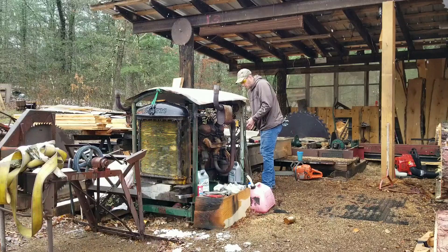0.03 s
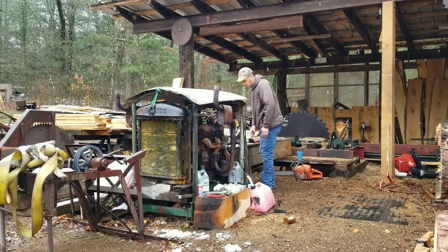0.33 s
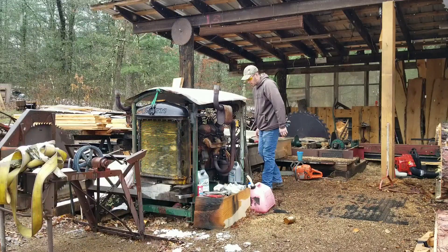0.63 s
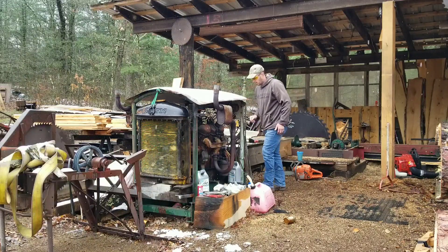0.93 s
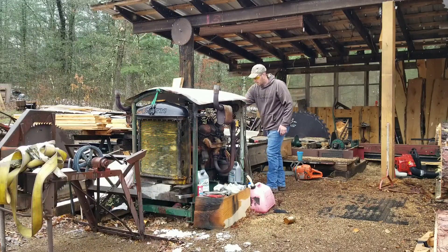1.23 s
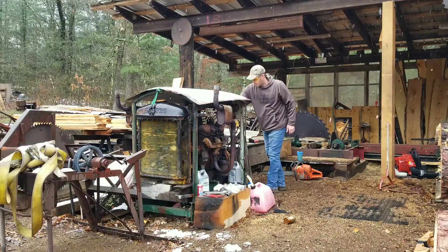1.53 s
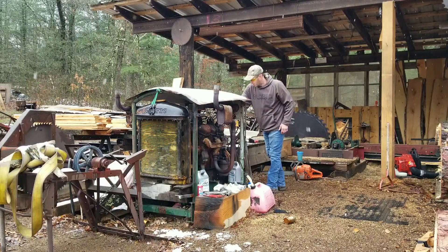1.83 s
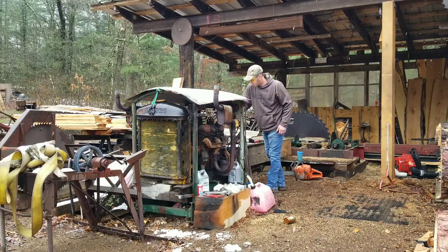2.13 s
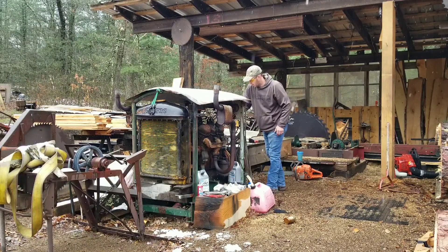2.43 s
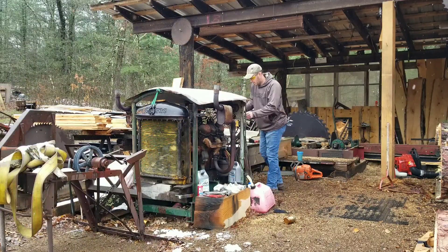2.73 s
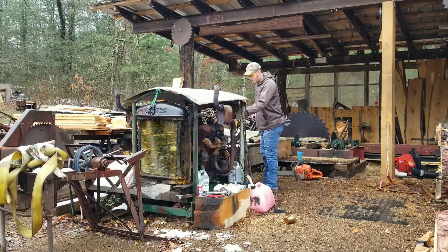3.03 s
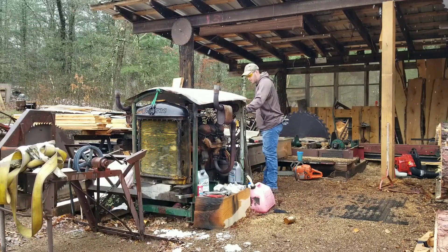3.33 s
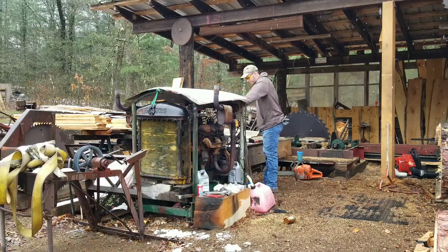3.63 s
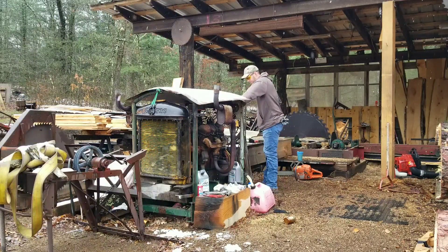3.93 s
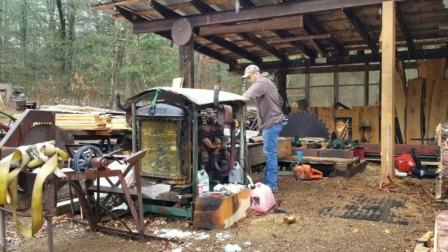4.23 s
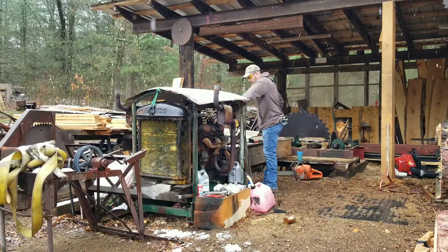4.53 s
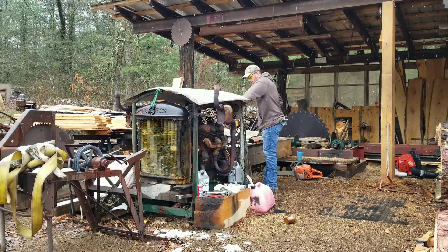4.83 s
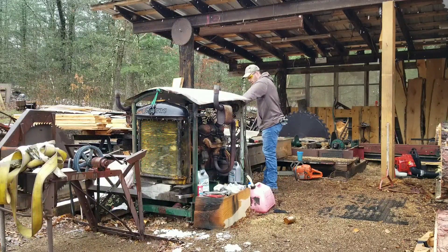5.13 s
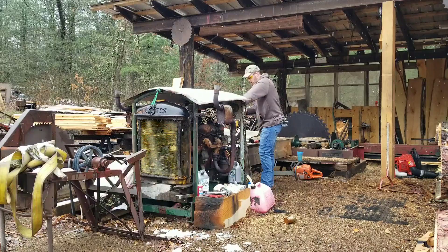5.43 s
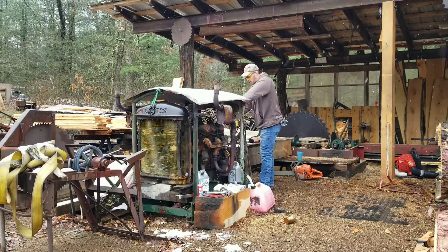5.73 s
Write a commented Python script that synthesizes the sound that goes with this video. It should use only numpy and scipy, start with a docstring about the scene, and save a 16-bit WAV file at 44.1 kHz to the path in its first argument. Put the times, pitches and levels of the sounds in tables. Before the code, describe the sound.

From the start, an old engine idles with low, uneven chugs about four times a second, with hard knocks, clacking valves and a jingle of loose metal. It slows slightly and stops firing near 1.8 seconds. Around 2 seconds it rocks to rest with a clunk, then a softer one at 2.4, along with a hollow rubbing and a hiss of escaping air that fade by about 3 seconds. A quiet gap holds only faint outdoor hiss and tiny ticks. Small clicks come near 3.9 seconds, and at 4.1 the starter engages with a loud metallic slam. It whirs up and cranks the engine with a growling, scraping gear whine that sags and surges about six times a second, continuing to the end near 6 seconds without the engine catching. Everything is heard from a few metres away, beside an open shed with very little echo.

```python
"""Sawmill engine, stopped and cranked

An old six-cylinder engine idles under an open shed: firings boom in the pipe and knock the block,
valves clack, loose gear rattles. Switched off, it slows and rocks to rest with a clunk, leaking air.
After a quiet gap the solenoid clicks, the starter pinion slams in and cranks the engine: the gear
growl sags on every compression stroke and slackens after it. Heard from a few metres off in the yard."""
import sys
import numpy as np
from scipy import signal
from scipy.fft import rfft, irfft
from scipy.io import wavfile
from scipy.ndimage import uniform_filter1d

SR = 44100
rng = np.random.default_rng(int(sys.argv[2]) if len(sys.argv) > 2 else 0)


def dump_mix(stems):
    """Bounce the given channels to the path in sys.argv[1] as a 16-bit WAV at rate SR."""
    frames = np.atleast_2d(stems).T  # one column per channel
    limited = np.clip(frames, -1, 1)  # hard clip at full scale
    pcm = np.round(limited * 32767).astype(np.int16)
    wavfile.write(sys.argv[1], SR, pcm)


N = 264600
T = np.arange(N) / SR


def undb(db):
    """Decibels to gain."""
    return 10 ** (np.asarray(db) / 20)


def unit(x):
    """Scale to rms 1."""
    return x / np.sqrt(np.mean(x ** 2))


def noise():
    """White noise."""
    return rng.standard_normal(N)


def ramp(start, end):
    """A fade from 0 at start to 1 at end; a fade-out if end comes first."""
    return np.clip((T - start) / (end - start), 0, 1)


def swell(at, rise, fall):
    """A straight rise to 1 and a straight fall back to 0."""
    return ramp(at - rise, at) * ramp(at + fall, at)


def release(start, t60):
    """An envelope that holds at 1 until start, then dies away."""
    return np.exp(-np.log(1000) * np.maximum(T - start, 0) / t60)


def decay(start, t60):
    """An envelope that jumps up at start and dies away."""
    return (T >= start) * release(start, t60)


def sift(x, hz, kind, order=2):
    """A plain low-pass or high-pass."""
    return signal.sosfilt(signal.butter(order, hz, kind, fs=SR, output="sos"), x)


def flutter(rate_hz, depth_db):
    """A gain that wanders at random."""
    return undb(depth_db * np.clip(unit(sift(noise(), rate_hz, "low")), -2, 2))


def convolve(x, response):
    """Pass a sound through an impulse response."""
    return signal.fftconvolve(x, response.reshape((1,) * (x.ndim - 1) + (-1,)), axes=-1)[..., :N]


def colour(x, points, size=4096):
    """Causal EQ through (Hz, dB) points that keeps the power of white noise."""
    hz, db = np.transpose(points)
    bin_hz = np.arange(size // 2 + 1) * SR / size
    log_gain = np.log(undb(np.interp(np.log(bin_hz + 1), np.log(hz), db)))
    cepstrum = irfft(log_gain)[:size // 2]
    cepstrum[0] /= 2
    response = irfft(np.exp(rfft(2 * cepstrum, size)))
    return convolve(x, response / np.linalg.norm(response))


def resonate(x, hz, width):
    """One resonance, gain 1 at its centre."""
    return signal.lfilter(*signal.iirpeak(hz, hz / width, fs=SR), x)


def ring(hits, hz, t60, phase=0):
    """One mode, struck by each impulse."""
    pole = np.exp((2j * np.pi * hz - np.log(1000) / t60) / SR)
    return (signal.lfilter([1], [1, -pole], hits + 1e-18) * np.exp(1j * phase)).imag


def taps(times, gains):
    """Impulses at the given times."""
    return np.bincount((np.clip(times, 0, None) * SR).astype(int), gains * (times >= 0), N)[:N]


def diffuse(split_hz=1300):
    """Stereo noise: alike in the bass, wide in the treble."""
    common = noise()
    wide = 0.11 * common + 0.88 * rng.standard_normal((2, N))
    return unit(sift(common, split_hz, "low", order=1) + sift(wide, split_hz, "high", order=1))


def stereo_phase(radians=0.54):
    """A high mode reaches one microphone or the other first."""
    return radians * rng.permutation([1, -1])[:, None]


def bursts(hits, t60):
    """Each impulse shakes many close modes: a burst of noise that swells quickly and dies."""
    return convolve(hits, decay(0, t60) * (1 - decay(0, 0.04))) * diffuse()


def grains(per_s, spread_db, t60, bed):
    """Many small collisions of uneven size over a bed of countless finer ones."""
    sizes = (rng.random(N) < per_s / SR) * undb(spread_db * np.clip(noise(), -2, 2))
    return unit(unit(bursts(sizes, t60)) + bed * diffuse())


def loose_part(hz, t60, per_s, spread=0.0306, count=4):
    """A loose part taps at random; where it is touched picks one of a few close pitches."""
    sound = 0
    for pitch in hz * (1 + spread * np.linspace(-1, 1, count)):
        hits = (rng.random(N) < per_s / count / SR) * rng.uniform(-0.88, 1, N)
        sound += ring(hits, pitch, t60, stereo_phase())
    return unit(sound)


def shimmer(hz):
    """A cluster of close modes around one pitch, rms 1."""
    width = 60 + hz / 35
    return unit(resonate(resonate(noise(), hz, width), hz, width))


# the idle's pulse, one row per four-stroke cycle: (start [s], exhaust [dB], knock [dB])
CYCLES = [(-.178, -6, 4), (.050, -6, 3), (.275, -5, 2.5), (.507, -4.5, 1.5), (.741, -3.5, -4),
          (0.991, -7.5, -3.5), (1.245, -6, -2.5), (1.504, -9, -1.5), (1.786, -28, 1.5)]
# accents in firing order: (place in the cycle [0-1], exhaust [dB], knock [dB], valve clack [dB])
CYLINDERS = [(0, 9, 1.5, -22), (0.159, 4, 0, -43), (0.336, 4.5, 2.5, -31.5), (0.492, -8.5, -1, -49),
             (0.668, 7, -0.5, -24), (0.825, -18, -0.5, -36)]


def firings():
    """Six cylinders fire in turn: times, boom gains, knock gains and valve levels in dB."""
    start, cycle_boom_db, cycle_knock_db = np.transpose(CYCLES)
    place, boom_db, knock_db, valve_db = np.transpose(CYLINDERS)
    cycle = np.arange(len(start))
    count = (len(start) - 1) * len(place) + 1  # the last cycle fires only once
    times = np.interp((cycle[:, None] + place).ravel()[:count], cycle, start)
    booms = undb((cycle_boom_db[:, None] + boom_db).ravel()[:count])
    knocks = undb((cycle_knock_db[:, None] + knock_db).ravel()[:count] + rng.standard_normal(count))
    return times, booms, knocks, np.resize(valve_db, count)


# stray puffs from late burns and unfired cylinders: (time [s], level [dB])
PUFFS = [(0, -0.5), (1.6, -9), (1.643, -3), (1.755, -0.5), (1.805, -1.5), (1.911, -14), (1.981, -21),
         (2.042, -4.5)]


def exhaust(times, booms):
    """Each puff of gas booms in two low modes of the pipe."""
    puff_s, puff_db = np.transpose(PUFFS)
    puffs = taps(times, booms) + taps(puff_s, undb(puff_db))
    return -(undb(-18.5) * ring(puffs, hz=56.2, t60=0.31) + undb(-43) * ring(puffs, hz=94, t60=0.25))


# boxy EQ of the block: (frequency [Hz], level [dB])
KNOCK_EQ = [(60, -41), (150, -3), (300, -19), (550, 1), (900, -5), (1500, -26), (3000, -10), (8000, -13)]
# ring of the hood panels: (pitch [Hz], t60 [s], level [dB])
HOOD_MODES = [(420, 0.036, -30), (504, 0.06, -4), (556, 0.052, 2), (656, 0.026, 6), (746, 0.023, 2),
              (920, 0.019, 2), (1103, 0.037, -1.5), (1280, 0.022, -12), (2096, 0.079, -6),
              (2740, 0.15, -35), (3220, 0.023, -25)]


def knock(times, knocks):
    """Each firing knocks the block and shakes the hood panels in a new mix."""
    block = undb(-31) * colour(bursts(taps(times, knocks), t60=0.05), KNOCK_EQ)
    hood = 0
    for hz, t60, db in HOOD_MODES:
        lag_s = 0.00405 * rng.random(len(times))
        scatter_db = 4.2 * np.clip(rng.standard_normal(len(times)), -2, 2)
        hood += ring(taps(times + lag_s, knocks * undb(db + scatter_db)), hz, t60)
    return block + undb(-41) * hood


# standout valve clacks: (time [s], crack [dB], low ring [dB], high ring [dB])
CLACKS = [(0.063, -32, -40, -33), (.163, -35, -36, -33), (.253, -55, -32.5, -52), (.288, -31, -37, -41),
          (.484, -38, -29, -43), (.519, -36, -50, -39), (0.5445, -24, -40, -33), (.623, -36, -38, -29.5),
          (.753, -47, -47, -35), (.780, -44, -37, -48), (.954, -34, -33, -41), (0.996, -35, -39, -45),
          (1.035, -42, -31, -39), (1.118, -22.5, -51, -35.5), (1.220, -36, -33.5, -41),
          (1.254, -29, -44, -40), (1.333, -21, -42, -36), (1.488, -46, -34, -49), (1.524, -32, -46, -42),
          (1.553, -29, -31, -34), (1.607, -22.5, -41, -35), (1.649, -27, -48, -31.5),
          (1.7463, -31, -36, -34), (1.7846, -23, -51, -41), (1.801, -35, -49, -38), (1.916, -32, -45, -58)]
# low and high ring of the rockers and push rods: (pitch [Hz], t60 [s], level [dB])
ROCKER_LOW = [(2650, .05, -7), (2900, .08, -1), (2960, .06, -4), (3110, .06, -4), (3230, .08, -2)]
ROCKER_HIGH = [(4200, 0.03, -11), (6300, 0.036, -11), (6490, 0.05, -6.5), (7090, 0.058, -6.5),
               (7360, 0.11, -10.5)]
# bright EQ of steel on steel: (frequency [Hz], level [dB])
CLANK_EQ = [(300, -8), (1000, 2), (3000, 3.5), (4500, 2.5), (7000, 4), (8300, -11), (11000, -4),
            (16000, -6)]


def valve_gear(times, knocks, valve_db, tappet_lag_s=0.0057, valve_lag_s=0.012):
    """Tappets and valves clack just behind each firing; the standout clacks ring the rockers."""
    tappets = undb(-35.5) * colour(bursts(taps(times + tappet_lag_s, knocks), t60=0.11), CLANK_EQ)
    clack_s, crack_db, low_db, high_db = np.transpose(CLACKS)
    valves = taps(times + valve_lag_s, undb(valve_db + 2.5 * rng.standard_normal(len(times))))
    clacks = undb(1.5) * colour(bursts(valves + taps(clack_s, undb(crack_db)), t60=0.042), CLANK_EQ)
    rockers = 0
    for modes, hit_db in (ROCKER_LOW, low_db - 1.5), (ROCKER_HIGH, high_db + 3):
        for hz, t60, db in modes:
            gains = undb(hit_db + db + 3 * rng.standard_normal(len(clack_s)))
            rockers += ring(taps(clack_s, gains), hz, t60, stereo_phase())
    return tappets + clacks + rockers


# the loose running gear swings once a cycle: (time [s], swell [dB])
SWINGS = [(.44, 4), (.655, 10), (.91, 9.5), (1.165, 7.5), (1.415, 8.5)]
# EQ of heavy clatter and thin jingle: (frequency [Hz], level [dB])
CLATTER_EQ = [(50, -16), (120, 0.5), (290, -6), (400, -4), (720, -4.5), (1200, -7.5), (2000, -18.5),
              (3500, -22), (8000, -39)]
JINGLE_EQ = [(700, -36), (1500, -3), (2300, 0.5), (3100, 1.5), (3800, -3), (5000, -3.5), (7000, -3.5),
             (8200, -17.5), (11000, -10.5), (16000, -9.5)]
# chattering brackets and rods: (pitch [Hz], t60 [s], level [dB], taps [1/s])
BRACKETS = [(2196, 0.016, -15.5, 71), (2898, 0.038, -11.5, 37), (3310, 0.17, -15, 100),
            (6540, 0.041, -18.5, 22), (7200, 0.049, -24, 99)]


def rattle():
    """Heavy gear clatters on each swing, thin parts jingle in between, linkage ticks; all ebb to rest."""
    swing_db = sum(db * swell(s, rise=0.12, fall=0.13) for s, db in SWINGS)
    coast = ramp(1.79, 1.94)  # from the last firing on
    clatter_db = -42 + swing_db - 5 * coast
    jingle_db = -35 - 0.24 * swing_db - 14.5 * coast
    ticks_db = -45.5 - 14.5 * coast
    clatter = colour(grains(per_s=260, spread_db=5.5, t60=0.079, bed=1), CLATTER_EQ)
    brackets = sum(undb(db) * loose_part(hz, t60, rate) for hz, t60, db, rate in BRACKETS)
    jingle = undb(-2) * colour(grains(per_s=300, spread_db=2.5, t60=0.016, bed=0.81), JINGLE_EQ)
    ticks = colour(grains(per_s=65, spread_db=4.3, t60=0.026, bed=0.25), CLANK_EQ)
    mix = undb(clatter_db) * clatter + undb(jingle_db) * (jingle + brackets) + undb(ticks_db) * ticks
    return mix * ramp(2.205, 2.114)  # fades out as the crank stops


# EQ of the outdoor air and its patter: (frequency [Hz], level [dB])
YARD_EQ = [(20, 4), (45, -4), (72, 6), (110, 0.5), (170, -5.5), (260, -14.5), (450, -14.5), (650, -12.5),
           (1250, -21.5), (2200, -23), (4000, -19), (7000, -15.5), (8600, -34), (16000, -25.5)]
PATTER_EQ = [(1500, -20), (3000, -2), (4000, 1), (5000, -1), (6500, -8), (8500, -23)]
# thin rings in the patter: (pitch [Hz], t60 [s], level [dB], ticks [1/s])
TINKLE = [(4000, .035, -82, 120), (5050, .04, -78, 90)]


def yard():
    """Faint outdoor bed: low rumble, soft hiss and a patter of tiny ticks, some of which ring."""
    patter = colour(grains(per_s=120, spread_db=2.2, t60=0.022, bed=0.31), PATTER_EQ)
    tinkle = sum(undb(db) * loose_part(hz, t60, rate) for hz, t60, db, rate in TINKLE)
    return undb(-61) * colour(diffuse(), YARD_EQ) + undb(-78) * patter + tinkle


# dying swings of the crank: (time [s], level [dB], t60 [s])
ROCKS = [(1.79, -68, 1.8), (2.06, -43, 1.55), (2.38, -43, 0.69), (2.67, -62.5, 1.3)]
# hollow body of the frame: (pitch [Hz], t60 [s], level [dB])
FRAME_MODES = [(132, 0.2, -20), (178.1, 0.5, -6), (204.8, 0.38, -9.5), (245, 0.23, -2), (374.3, 0.19, -4),
               (516.5, 0.34, -14), (624, 0.21, -22), (743, 0.064, -1), (900, 0.041, -45)]


def crank_rub(attack_s=0.034):
    """The crank rubs as it rocks to rest, sounding hollow through the frame."""
    friction = noise()
    hollow = unit(sum(undb(db / 2) * ring(friction, hz, t60) for hz, t60, db in FRAME_MODES))
    rocking = sum(undb(db) * ramp(s - attack_s, s) * release(s, t60) for s, db, t60 in ROCKS)
    return rocking * (undb(-4) * hollow + undb(-13) * colour(diffuse(), CLATTER_EQ))


# EQ of the escaping air: (frequency [Hz], level [dB])
LEAK_EQ = [(800, 2.5), (3000, -3), (7000, 0.5), (8500, -11), (11000, -5), (16000, 0)]


def air_leak():
    """Air hisses out of the settling cylinders: it builds, holds and dies away."""
    return undb(-49.5) * ramp(1.8, 2.01) * release(2.22, t60=0.87) * colour(diffuse(), LEAK_EQ)


# hits as the crank rocks to rest and the starter bites:
# (time [s], thud [dB], clank [dB], thud t60 [s], clank t60 [s])
BLOWS = [(1.949, -41, -48, 0.086, .05), (2.031, -36, -32, 0.46, 0.23), (2.061, -33, -41, 0.065, 0.099),
         (2.087, -28, -68, 0.2, 0.16), (2.351, -40, -57.5, 0.41, 0.22), (2.473, -49, -61, 0.12, 0.15),
         (2.671, -49.5, -84, 0.22, 0.12), (2.714, -58, -72, 0.16, 0.052), (3.027, -68, -62, .05, .08),
         (3.936, -60.5, -56.5, 0.66, 0.22), (4.048, -52, -52.5, 0.15, 0.3),
         (4.065, -45.5, -41.5, 0.35, 0.81), (4.093, -34.5, -47, 0.1, 0.5), (4.123, -21, -24, 0.15, 0.078),
         (4.138, -19.5, -45, 0.22, 0.033)]
# dull thumps of the cranked engine: (time [s], level [dB])
THUMPS = [(4.667, -27), (4.890, -31), (5.158, -28), (5.506, -32), (5.650, -28.5)]
# dark EQ of a thud: (frequency [Hz], level [dB])
THUD_EQ = [(30, -49), (70, 6), (130, 4.5), (220, 5), (450, -2), (800, -5.5), (1300, -9), (2500, -21),
           (8000, -57)]


def blows(thump_t60=0.087):
    """Heavy contacts: a dull thud that rings the frame, layered with a bright clank of steel."""
    thuds = [(s, db, t60) for s, db, _, t60, _ in BLOWS] + [(s, db, thump_t60) for s, db in THUMPS]
    thud_envelope = sum(undb(db) * decay(s, t60) for s, db, t60 in thuds)
    clank_envelope = sum(undb(db) * decay(s, t60) for s, _, db, _, t60 in BLOWS)
    thud = colour(sift(thud_envelope, 290, "low") * diffuse(), THUD_EQ)
    clank = colour(sift(clank_envelope, 140, "low") * diffuse(), CLANK_EQ)
    thud_s, thud_db, _ = np.transpose(thuds)
    frame = sum(undb(db) * ring(taps(thud_s, undb(thud_db)), hz, t60) for hz, t60, db in FRAME_MODES)
    return undb(-6) * thud + clank + undb(-6.5) * frame


# metallic accents: (time [s], pitch [Hz], level [dB], t60 [s])
PINGS = [(2.07, 754, -32, 0.25), (2.18, 2480, -56, 0.12), (2.531, 3262, -59.5, 0.14),
         (2.5, 490, -49.5, 0.13), (2.47, 735, -51, 0.13), (2.714, 554, -51, .1), (3.027, 4030, -62, .06),
         (3.88, 6930, -66, .2), (3.937, 4920, -61, .12), (4.066, 1180, -42.5, 0.18),
         (4.065, 1570, -46, 0.2)]


def pings():
    """Thin steel parts ring briefly."""
    return sum(undb(db) * decay(s, t60) * shimmer(hz) for s, hz, db, t60 in PINGS)


# the pinion's double hit: (time [s], level [dB])
PINION_HITS = [(4.089, -43), (4.135, -33.5)]
# its high ring: (pitch [Hz], t60 [s], level [dB])
PINION_MODES = [(10500, 0.1, -3), (14650, 0.13, -1)]


def pinion():
    """The pinion touches the ring gear, then slams home."""
    return sum(shimmer(hz) * sum(undb(db + hit_db) * decay(s, t60) for s, hit_db in PINION_HITS)
               for hz, t60, db in PINION_MODES)


# the starter whirs up, then labours into the first compression: (time [s], tooth rate [Hz])
SPIN_UP = [(4.12, 200), (4.18, 292), (4.27, 330), (4.305, 392), (4.36, 385), (4.39, 300), (4.42, 252),
           (4.495, 224)]
# each piston passing the top: (time [s], slow tooth rate before [Hz], fast tooth rate after [Hz],
# growl boost under load [dB], scrape dip when slack [dB], rasp on unloading [dB])
STROKES = [(4.515, 240, 460, 3, 7.5, 3.5), (4.688, 290, 460, 2, 10, 0.5), (4.853, 302, 462, 2.5, 0, 3),
           (5.008, 316, 462, 0.5, 4.5, 0.5), (5.183, 294, 440, 2, 10.5, -2), (5.340, 310, 458, 1, 6, 2),
           (5.508, 290, 465, 3, 7, 3), (5.676, 302, 455, 0.5, 10, -2), (5.843, 303, 468, 1.5, 6, 2),
           (6.01, 316, 455, 1.5, 3, 2)]
STARTER_S = 4.12  # the starter bites


def cranking(drag_lead_s=0.064, surge_lag_s=0.028):
    """Tooth rate, growl dB and scrape dB: compression drags the gear, which goes slack, then surges."""
    speeds = list(SPIN_UP)
    growl_db = -36.5 + 0.5 * ramp(SPIN_UP[-1][0], STARTER_S)  # louder while it gets the crank moving
    scrape_db = -44
    for top, slow_hz, fast_hz, load_db, slack_db, rasp_db in STROKES:
        speeds += [(top - drag_lead_s, slow_hz), (top + surge_lag_s, fast_hz)]
        drag = swell(top - drag_lead_s, rise=0.06, fall=0.06)
        unloading = swell(top - 0.036, rise=0.025, fall=0.025)
        slack = swell(top + 0.0014, rise=0.039, fall=0.045)  # the tooth flanks part
        surge = swell(top + surge_lag_s, rise=0.027, fall=0.06)  # trapped air throws the crank forward
        growl_db += load_db * drag - 5 * slack
        scrape_db += 3 * surge + rasp_db * unloading - slack_db * slack
    tooth_hz = np.interp(T, *np.transpose(sorted(speeds)))
    return uniform_filter1d(tooth_hz, size=1100), growl_db, scrape_db  # the flywheel rounds each change


def worn_shaft(turns, partials=80, size=1024):
    """A shaft's scars come round on every turn: a dense comb of partials that glide with its speed."""
    surface = irfft(np.r_[0, np.exp(2j * np.pi * rng.random(partials))], size)
    return unit(np.interp(turns % 1 * size, np.arange(size), surface))


# partials of the gear whine: (pitch [x tooth rate], level [dB])
GEAR_ORDERS = [(.89, -11), (1, -2), (1.11, -7), (2, -1), (2.22, -9), (2.77, -6), (3, -3), (3.77, -8),
               (4, 0), (5, -3), (5.2, -8), (6, -13)]
# resonances of the block and bell housing: (pitch [Hz], width [Hz], level [dB])
HOUSING_MODES = [(248, 20, 5), (356, 30, 7), (400, 40, 5), (755, 28, 10), (848, 28, 6), (930, 50, -1),
                 (1160, 34, 7), (1232, 45, 5), (1348, 40, -2), (1610, 65, 4), (1800, 120, -3),
                 (2460, 36, 3)]
# EQ of the throaty growl and the bright scrape: (frequency [Hz], level [dB])
GROWL_EQ = [(60, -11.5), (190, 4.5), (310, 4), (400, 0.5), (520, -1), (900, 2), (1230, 1.5), (1470, -2.5),
            (1640, 0.5), (2000, -9), (3300, -5), (5000, -12.5), (9000, -35)]
SCRAPE_EQ = [(1000, -24), (2500, 3), (4200, 3.5), (5100, -3), (5700, 3.5), (7200, -0.5), (8400, -12.5),
             (10500, -2.5), (11700, -6.5), (12500, -4.5), (16000, -5)]
# steel parts that the starter shakes: (pitch [Hz], t60 [s], level [dB], taps [1/s])
STARTER_RATTLE = [(3100, 0.055, -11.5, 160), (4120, 0.025, -15.5, 120), (5720, 0.054, -14, 150),
                  (6700, 0.038, -18, 110)]


def starter(pinion_teeth=9):
    """Worn gears whine, scrape and ring the housing, swooping down and up with each compression."""
    tooth_hz, growl_db, scrape_db = cranking()
    jitter = 0.008 * unit(uniform_filter1d(noise(), size=200))
    phase = np.cumsum(tooth_hz * (1 + jitter)) / SR  # counts teeth
    teeth = unit(np.diff(np.floor(phase), prepend=0) * undb(1.5 * noise()))  # one uneven click each
    whine = unit(sum(undb(db) * flutter(35, 2.5) * np.sin(2 * np.pi * (order * phase + rng.random()))
                     for order, db in GEAR_ORDERS))
    load = np.clip(1 - np.gradient(tooth_hz) * SR / 2200, 0.35, 1)  # lighter as the crank runs ahead
    scars = worn_shaft(phase / pinion_teeth)
    grind = unit(sift(np.exp(-(phase % 1) / 0.5) * diffuse(), 4330, "low"))
    drive = np.sqrt(load) * whine + undb(-5) * scars + undb(-18) * teeth + undb(-10) * grind
    housing = sum(undb(db) * resonate(drive, hz, width) for hz, width, db in HOUSING_MODES)
    housing = sift(housing, 3700, "low")
    housing /= np.std(housing[:, T > STARTER_S])
    # each partial flutters as it glides across the block's many small modes
    block = unit(convolve(scars, noise() * decay(0, t60=0.042)))
    roughness = colour(unit(block + grind), GROWL_EQ)
    growl = undb(-2) * housing + undb(-7.5) * load * whine + undb(-8.5) * roughness
    # on the slow first stroke the tooth rate meets the lowest resonance and groans
    groan = undb(7) * resonate(resonate(np.cos(2 * np.pi * phase), 246, width=28), 246, width=30)
    grit = sum(undb(db) * loose_part(hz, t60, rate) for hz, t60, db, rate in STARTER_RATTLE)
    rasp = flutter(30, 1.3) * grains(per_s=600, spread_db=5.4, t60=0.022, bed=0.6)
    pinion_home = ramp(4.185, 4.216)
    scrape = pinion_home * (colour(undb(-8) * teeth + undb(0.16) * rasp, SCRAPE_EQ) + grit)
    frame_shudder = undb(-55) * unit(sift(sift(noise(), 68, "low"), 31, "high"))
    mix = undb(growl_db) * (growl + groan) + undb(scrape_db) * scrape + frame_shudder
    return mix * ramp(STARTER_S, STARTER_S + 0.031)


def shed(x, t60=0.038, wet_db=-12):
    """Roof and timber stacks scatter the sound into a very short tail."""
    echoes = rng.standard_normal((2, N)) * decay(0.0024, t60)
    tail = np.array([convolve(side, echo / np.linalg.norm(echo)) for side, echo in zip(x, echoes)])
    return x + undb(wet_db) * sift(sift(tail, 400, "high"), 6200, "low", order=1)


def scene():
    """The engine in its shed, and the yard around it."""
    times, booms, knocks, valve_db = firings()
    idle = exhaust(times, booms) + knock(times, knocks) + valve_gear(times, knocks, valve_db) + rattle()
    impacts = blows() + pings() + pinion()
    settling = crank_rub() + air_leak()
    return shed(idle + impacts + settling + starter()) + yard()


def record(dry):
    """The left microphone gets more treble; the phone cuts the lowest bass and the top."""
    facing = 0.064 * sift(dry, 150, "high", order=1) + 0.46 * sift(dry, 12800, "high", order=1)
    heard = dry + np.array([[1], [-1]]) * facing
    top_cut = signal.ellip(10, 0.2, 80, 15950, fs=SR, output="sos")
    return signal.sosfilt(top_cut, sift(heard, 57.4, "high", order=1))


dry = scene()
out = record(dry)
dump_mix(out)
```